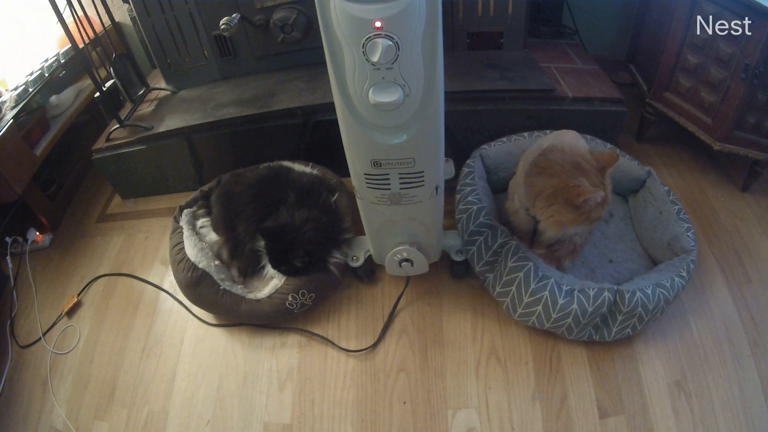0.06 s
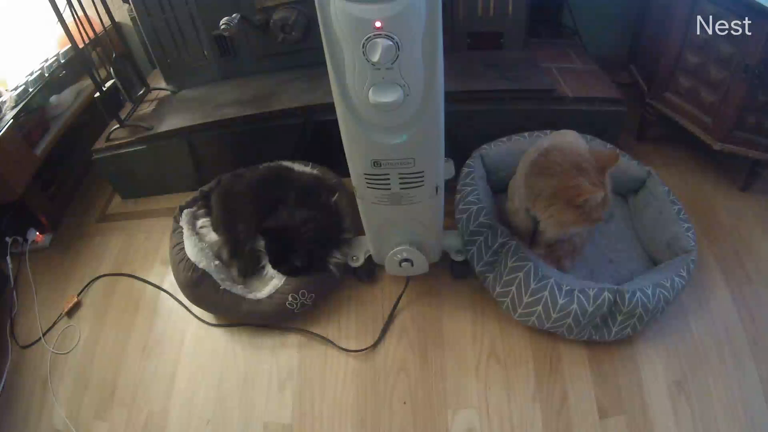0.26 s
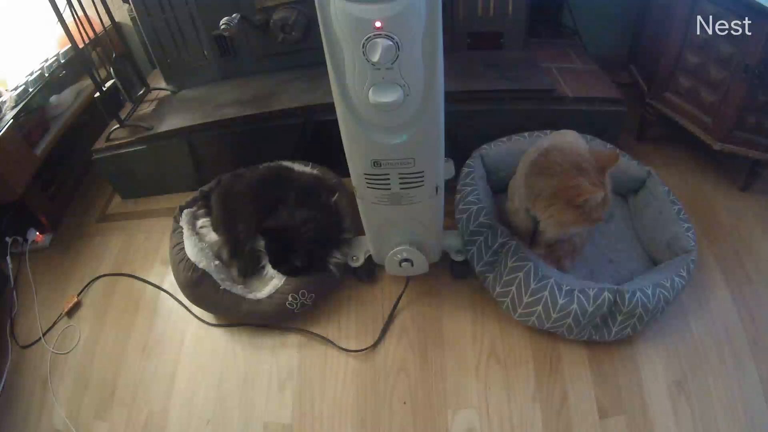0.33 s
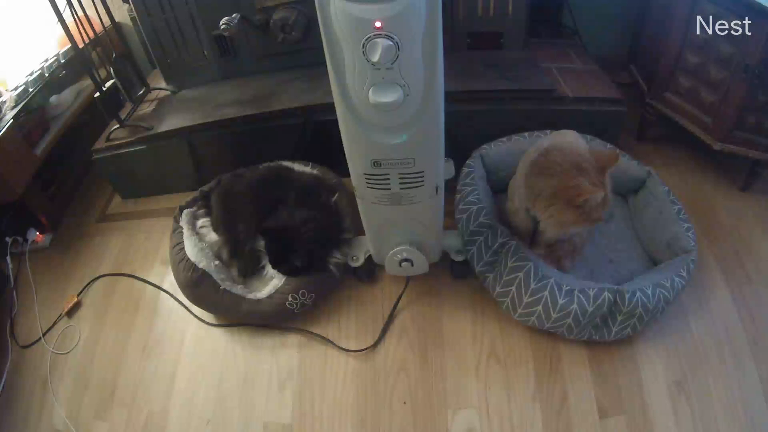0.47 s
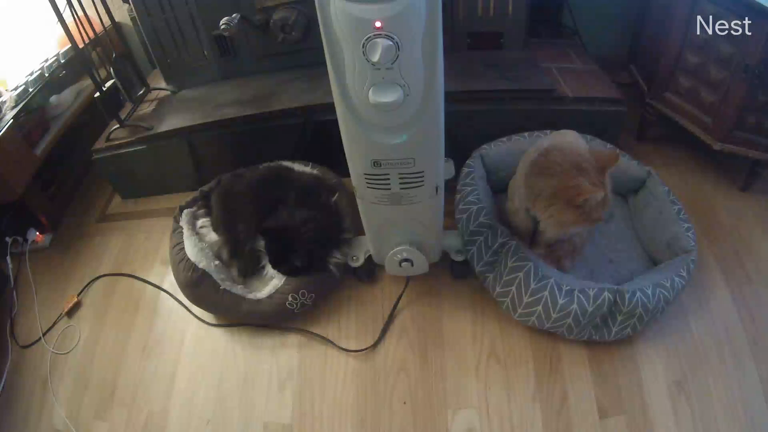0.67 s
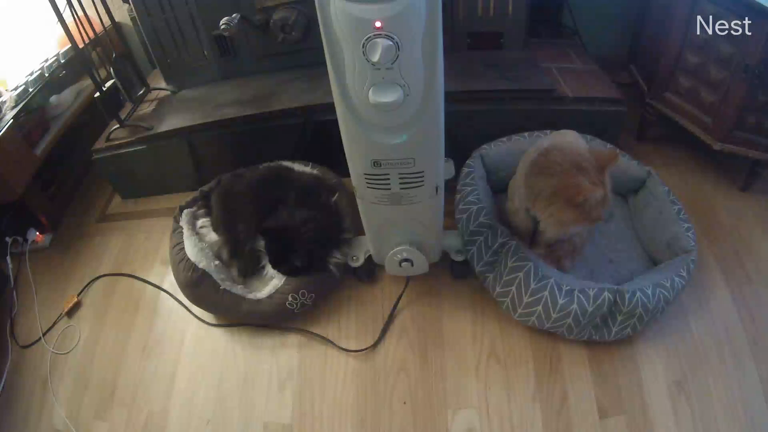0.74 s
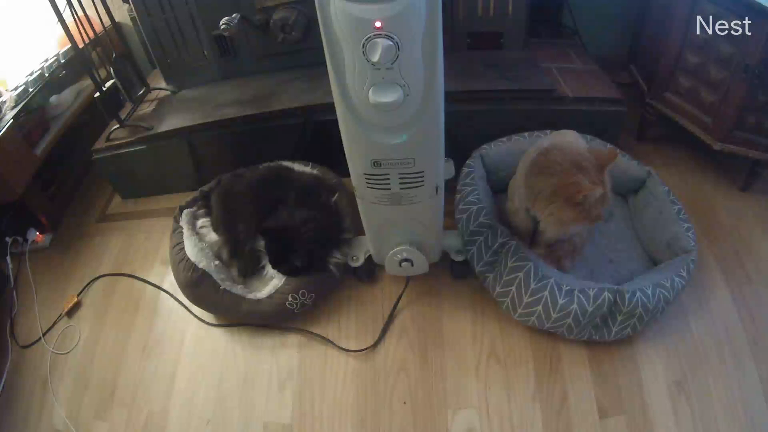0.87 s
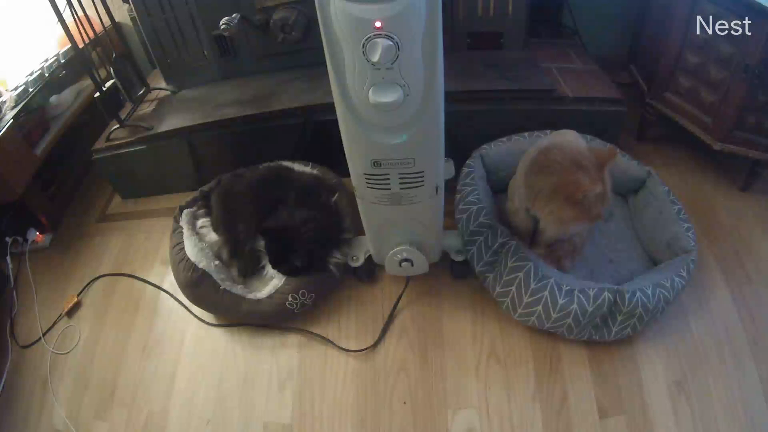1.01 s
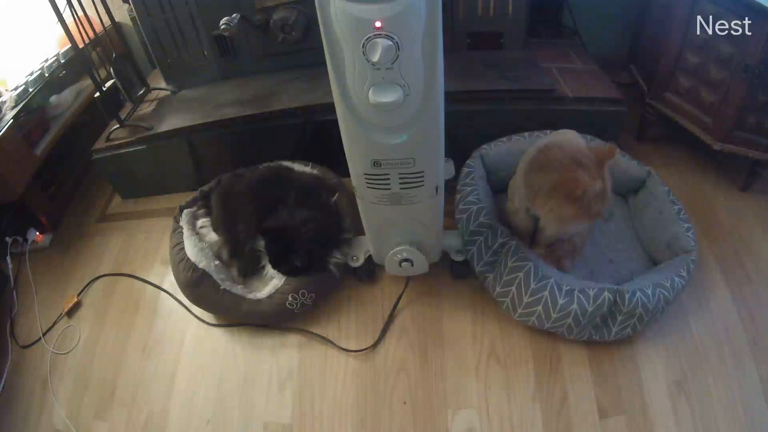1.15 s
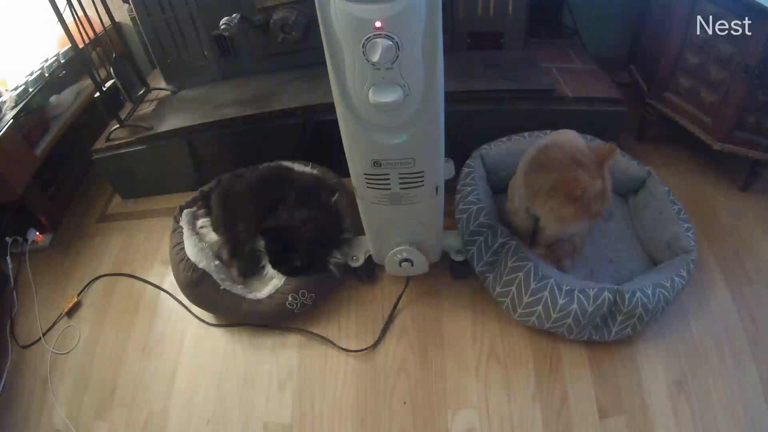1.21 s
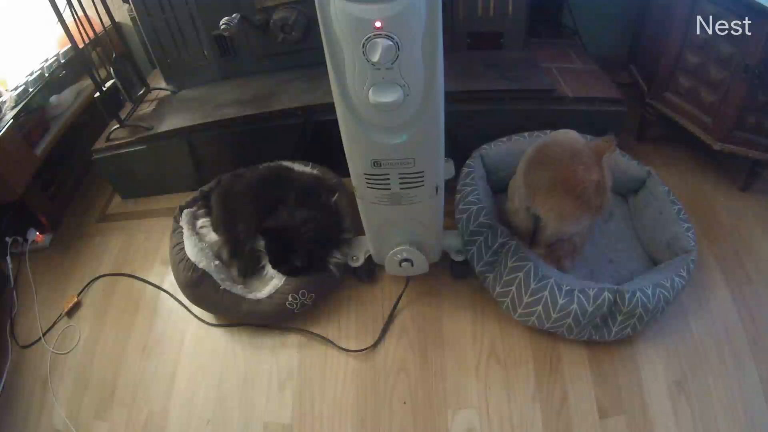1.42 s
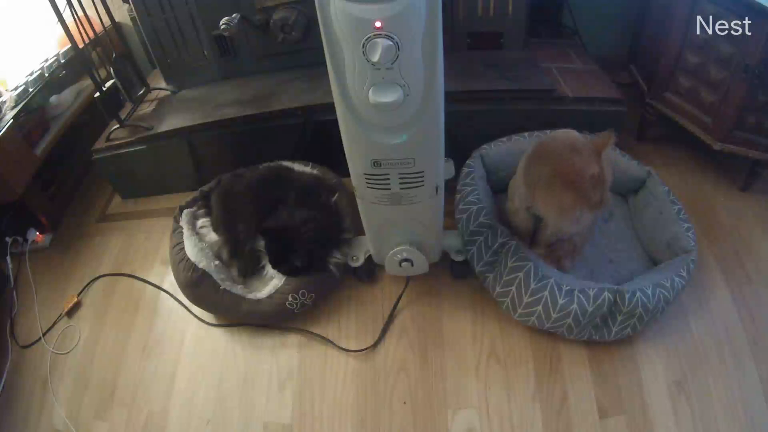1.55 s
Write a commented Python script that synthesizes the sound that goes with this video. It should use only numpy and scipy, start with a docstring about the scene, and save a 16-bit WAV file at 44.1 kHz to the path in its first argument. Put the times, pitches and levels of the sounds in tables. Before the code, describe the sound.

Sharp metal ticks from an oil-filled heater in a quiet room, with soft fabric rustles.

```python
"""Sharp ticks from an oil-filled heater, its steel fins expanding in a quiet room with a wooden floor.
Each tick reaches one small microphone as a snap, then echoes off floor and furniture, a short ring
of fins and casing, and the room's tail. A faint, soft lead-in comes just before each of the two main
ticks, and bright pings follow the loudest. Soft rustles and bumps, probably a cat shifting in its
fabric bed, and one faint scrape come and go over a steady hiss with a thin whine in it."""
import sys
import numpy as np
from scipy import signal
from scipy.fft import rfft, irfft
from scipy.io import wavfile
from scipy.ndimage import uniform_filter1d

SR = 44100
rng = np.random.default_rng(int(sys.argv[2]) if len(sys.argv) > 2 else 0)


def bounce(signal):
    """Save signal as a 16-bit WAV file at the path given by the first command-line argument."""
    frames = np.transpose(np.atleast_2d(signal))
    limited = np.clip(frames, -1, 1)
    pcm = np.round(limited * 32767).astype(np.int16)
    wavfile.write(sys.argv[1], SR, pcm)


N = 70560

# decay of the room (frequency [Hz], t60 [s])
ROOM_T60 = [(300, .22), (1000, 0.31), (2500, 0.18), (6000, 0.15)]
# colour of the room's tail (frequency [Hz], level [dB])
TAIL_COLOUR = [(300, 0), (1000, -1.5), (2600, 1.5), (4000, -3), (5200, -3.5), (7000, 2)]
# first echoes off floor, furniture and walls, against the direct snap (delay [s], level [dB])
ECHOES = [(0.0045, -0.5), (0.0082, -7), (0.0108, -4), (0.0163, -9), (0.0185, -6)]
SCATTER_DB, SCATTER_START_S, SCATTER_END_S = -1, .008, 0.024  # dense early reflections
TAIL_DB, TAIL_BUILD_S = 6, 0.014
LATE_DB, LATE_T60_S = -3.5, 0.78  # the longer tail, against the main one

# colour of the background hiss (frequency [Hz], level [dB])
HISS_COLOUR = [(120, -67), (190, -19.5), (260, -7.5), (450, -3), (900, 1), (1500, 1.5), (2600, 1),
               (4000, -3), (5000, -3), (5400, -16.5), (6800, -9), (7500, -24.5), (8000, -40)]
HISS_DB, HISS_WAVER_DB = -58, .6
WHINE_HZ, WHINE_DB, WHINE_WAVER_DB = 5000, -82, 7.5
# colour of the scrape (frequency [Hz], level [dB])
SCRAPE_COLOUR = [(300, -34), (900, -15.5), (1220, 8), (1600, -26.5), (2500, -12), (2920, 9.5), (3400, -14),
                 (7000, -13), (8000, -54.5)]
SCRAPE_AT_S, SCRAPE_WIDTH_S, SCRAPE_DB = 0.614, 0.047, -56.5

# soft bumps on the bed (time [s], level [dB])
BUMPS = [(0.299, -57), (0.84, -64.5), (0.951, -62), (1.012, -63)]
# low modes of the bed and the floorboards (frequency [Hz], level [dB], t60 [s])
BED_MODES = [(215.7, -4.5, 0.14), (268, -0.5, 0.12), (336, -1.5, 0.16), (404, -7, 0.091)]
BUMP_ATTACK_S = 0.014
# rustles of the bed (start [s], attack [s], hold [s], fade time constant [s], level [dB],
# treble tilt [dB/octave], thud against the rustle [dB])
RUSTLES = [(0.115, 0.034, 0.018, 0.031, -54.5, 1.5, -20.5), (0.158, 0.06, 0.017, 0.098, -48, 0.4, -17.5),
           (0.751, 0.016, 0.022, 0.035, -59.5, -2.5, -6), (0.797, 0.02, 0.062, 0.12, -64.5, 0.5, -9),
           (0.94, 0.021, 0.027, 0.043, -50, 0.7, -2), (1.005, 0.024, 0.025, 0.085, -58, -0.5, -11),
           (1.169, 0.026, 0.023, 0.055, -55.5, -1, -16.5)]
# colour of rubbing fabric (frequency [Hz], level [dB])
FABRIC_COLOUR = [(100, -29.5), (300, -18), (650, -4.5), (1300, -4.5), (2200, -0.5), (3400, -3),
                 (5000, -0.5), (6500, -4.5), (7600, -17), (8500, -36)]
# colour of the cushion's thud (frequency [Hz], level [dB])
CUSHION_COLOUR = [(80, -19.5), (290, -20.5), (410, -4), (500, -3.5), (600, 1), (720, -8), (845, -3),
                  (1020, -17), (1160, -7.5), (1350, -20), (1590, -15), (1700, 1), (1850, -16), (2500, -37)]
FIBRES_PER_S, FIBRE_SPREAD_DB, RUSTLE_ROOM_DB = 3000, 2, 4.5

# bright pings from the heater (time [s], level [dB])
PINGS = [(0.3630, -37.5), (0.3685, -38), (0.3745, -40)]
# modes of the steel edge that pings (frequency [Hz], level [dB], t60 [s])
EDGE_MODES = [(5090, -3, 0.045), (5255, -5.5, 0.044)]
# ticks, and a faint, soft lead-in just before each of the two main ones (0.3423, 0.3556 and 1.2222 s)
# (time [s], level [dB], treble tilt [dB/octave], ring [dB], thump [dB], room tail [dB]), levels relative
TICKS_AND_LEAD_INS = [(0.3423, -14.5, 0.5, -8.5, -23, 5.5), (0.3556, -9.5, 2.5, -9.5, -17.5, 0),
                      (0.3582, -7, 1.5, -12, -17, -5), (0.3600, 0.8, -0.3, 1, -4, -3.5),
                      (1.2222, -19.5, -1.5, 1.5, -3, -1), (1.2256, -12, -1.5, 2.5, 9, -3),
                      (1.2596, -21, -1.5, -0.5, -8, -2), (1.291, -26, -2, 3, -17, -1),
                      (1.3025, -23, -0.5, 0, -11, -4), (1.3223, -26, -1.5, 0, -10, -5)]
# colour of a snap (frequency [Hz], level [dB])
SNAP_COLOUR = [(100, -47), (250, -19), (420, -5), (800, -3), (1300, -3.3), (2000, 3.3), (2900, 0),
               (4100, 3.2), (4700, -6), (5200, -3.5), (5600, -8), (6700, -13), (7300, -54)]
# modes of the fins (frequency [Hz], level [dB], t60 [s])
FIN_MODES = [(1156, 4.5, 0.31), (1800, 10, 0.13), (1970, 0, 0.18), (2090, -2, 0.36), (2135, 0.5, 0.28),
             (2208, -3, 0.43), (2274, 1.5, 0.37), (2396, -4, 0.4), (2454, -1.5, 0.45), (2515, -2.5, 0.4),
             (2604, -1.5, 0.57), (2658, 0, 0.35), (2845, -4, 0.28), (3135, -1.5, 0.4), (3413, 0, 0.43),
             (3633, 1.5, 0.18), (3700, -2, 0.17), (3805, -2.5, 0.25), (4090, 1.5, 0.24), (4414, 4, 0.17),
             (5072, 4, 0.25)]
# short, hollow modes of the casing (frequency [Hz], level [dB], t60 [s])
CASING_MODES = [(474, 5, 0.14), (752, 1.5, 0.25), (851, 1, 0.32), (1010, 4, 0.2), (1091, 5, 0.12),
                (1243, 8.5, 0.1)]
SNAP_DB, RING_DB = -8, -40
THUMP_HZ, THUMP_T60_S, THUMP_DB = 232.4, 0.11, -60  # lowest mode of the casing

MIC_LOW_HZ, MIC_TOP_HZ = 130, 8600


def undb(db):
    """Decibels to amplitude."""
    return 10 ** (np.asarray(db) / 20)


def unit(x):
    """Scale to rms 1."""
    return x / np.sqrt(np.mean(x ** 2))


def lookup(points, hz):
    """Read (frequency [Hz], value) points on a log-frequency axis."""
    freqs, values = np.array(points, float).T
    return np.interp(np.log(hz + 1), np.log(freqs), values)


def colour(x, points, tilt_db=0, size=4096):
    """Causal filter through (frequency [Hz], level [dB]) points, tilted about 2 kHz."""
    hz = np.fft.rfftfreq(size, 1 / SR)
    octaves = np.log2(np.maximum(hz, 200) / 2000)
    cepstrum = irfft(np.log(undb(lookup(points, hz) + tilt_db * octaves)))
    cepstrum[1:size // 2] *= 2  # fold to minimum phase
    cepstrum[size // 2 + 1:] = 0
    return through(x, irfft(np.exp(rfft(cepstrum))))


def through(x, response):
    """Convolve and keep the length."""
    return signal.fftconvolve(x, response)[:len(x)]


def pulse(at_s):
    """One unit impulse."""
    return 1. * (np.arange(N) == int(at_s * SR))


def fade(t, t60):
    """Decay by 60 dB in t60 seconds."""
    return np.exp(-np.log(1000) * t / t60)


def drift(rate_hz):
    """Slow random drift of rms 1."""
    step = int(SR / rate_hz)
    stairs = np.repeat(rng.standard_normal(N // step + 1), step)
    return unit(uniform_filter1d(stairs, step)[:N])


def ringing(t, modes):
    """Damped modes set off together at random phases."""
    return sum(undb(db) * fade(t, t60) * np.sin(2 * np.pi * (hz * t + rng.random()))
               for hz, db, t60 in modes)


def room_tail(t, bands=14):
    """The room's diffuse sound: half-octave bands die at their own rates over a fainter, longer tail."""
    spectrum, hz = rfft(rng.standard_normal(N)), np.fft.rfftfreq(N, 1 / SR)
    centres = np.geomspace(100, 9000, bands)
    tail = 0
    for centre, share in zip(centres, np.eye(bands)):
        band = irfft(spectrum * np.interp(hz, centres, share), N)
        tail += band * fade(t, lookup(ROOM_T60, centre))
    late = rng.standard_normal(N) * fade(t, LATE_T60_S)
    build = 1 - np.exp(-t / TAIL_BUILD_S)
    both = unit(tail * build) + undb(LATE_DB) * unit(late * build)
    return colour(both, TAIL_COLOUR) / np.sqrt(N)


def hiss(t):
    """Room tone: a slightly wavering hiss with a faint thin whine that comes and goes."""
    air = unit(colour(rng.standard_normal(N), HISS_COLOUR))
    air *= undb(HISS_DB + HISS_WAVER_DB * drift(rate_hz=11.68))
    whine = unit(np.sin(2 * np.pi * WHINE_HZ * t + drift(rate_hz=10)))
    return air + undb(WHINE_DB + WHINE_WAVER_DB * drift(rate_hz=3.5)) * whine


def scrape(t):
    """A brief, faint scrape in the background swells in two resonances."""
    swell = np.exp(-((t - SCRAPE_AT_S) / SCRAPE_WIDTH_S) ** 2 / 2)
    return undb(SCRAPE_DB) * swell * unit(colour(rng.standard_normal(N), SCRAPE_COLOUR))


def bumps(t):
    """Padded contacts, probably paws, sound the low modes of the bed and the boards under it."""
    onset = 1 - np.exp(-t / BUMP_ATTACK_S)
    return sum(undb(db) * through(pulse(at), onset * ringing(t, BED_MODES)) for at, db in BUMPS)


def rustles(t, tail):
    """Fabric rubs in swells of tiny fibre clicks, with a soft thud where weight lands on the cushion."""
    out = 0
    for start, attack, hold, release, db, tilt_db, thud_db in RUSTLES:
        fibres = (rng.random(N) < FIBRES_PER_S / SR) * rng.standard_normal(N)
        fibres *= undb(FIBRE_SPREAD_DB * rng.standard_normal(N))
        fibres += undb(RUSTLE_ROOM_DB) * through(fibres, tail)
        fabric = unit(colour(fibres, FABRIC_COLOUR, tilt_db))
        thud = unit(colour(rng.standard_normal(N), CUSHION_COLOUR))
        rise = np.clip((t - start) / attack, 0, 1)
        fall = np.exp(-np.maximum(t - start - attack - hold, 0) / release)
        out += undb(db) * rise * fall * (fabric + undb(thud_db) * thud)
    return out


def edge_pings(t):
    """A thin steel edge chatters brightly just behind the loudest tick."""
    return sum(undb(db) * through(pulse(at), ringing(t, EDGE_MODES)) for at, db in PINGS)


def heater(t, tail):
    """Snaps ring the steel and arrive direct, then by the room; faint lead-ins soften the main two."""
    scatter = rng.standard_normal(N) * (t > SCATTER_START_S) * (t < SCATTER_END_S)
    echoes = sum(undb(db) * pulse(delay) for delay, db in ECHOES)
    early = pulse(0) + echoes + undb(SCATTER_DB) * unit(scatter) / np.sqrt(N)
    ring = ringing(t, FIN_MODES) + ringing(t, CASING_MODES)
    thump = fade(t, THUMP_T60_S) * np.sin(2 * np.pi * THUMP_HZ * t)
    out = 0
    for at, db, tilt_db, ring_db, thump_db, room_db in TICKS_AND_LEAD_INS:
        snap = undb(SNAP_DB + db) * colour(pulse(at), SNAP_COLOUR, tilt_db)
        out += through(snap, early + undb(TAIL_DB + room_db) * tail + undb(RING_DB + ring_db) * ring)
        out += undb(THUMP_DB + db + thump_db) * through(pulse(at), thump)
    return out


def scene():
    """The room from where the microphone stands, in mono: heater and bed over the hiss."""
    t = np.arange(N) / SR
    tail = room_tail(t)
    mix = heater(t, tail) + rustles(t, tail) + hiss(t) + scrape(t) + edge_pings(t) + bumps(t)
    return mix[None]


def record(dry):
    """A small microphone: no deep bass, and a steep cut at the top."""
    low_cut = signal.butter(4, MIC_LOW_HZ, "high", fs=SR, output="sos")
    top_cut = signal.ellip(8, .2, 70, MIC_TOP_HZ, fs=SR, output="sos")
    return signal.sosfilt(top_cut, signal.sosfilt(low_cut, dry))


dry = scene()
out = record(dry)
bounce(out)
```